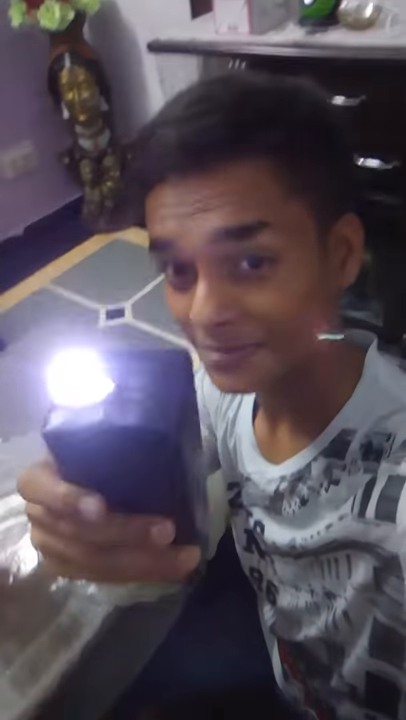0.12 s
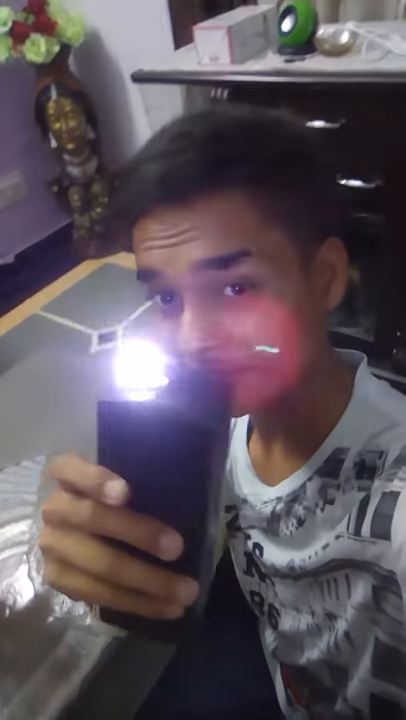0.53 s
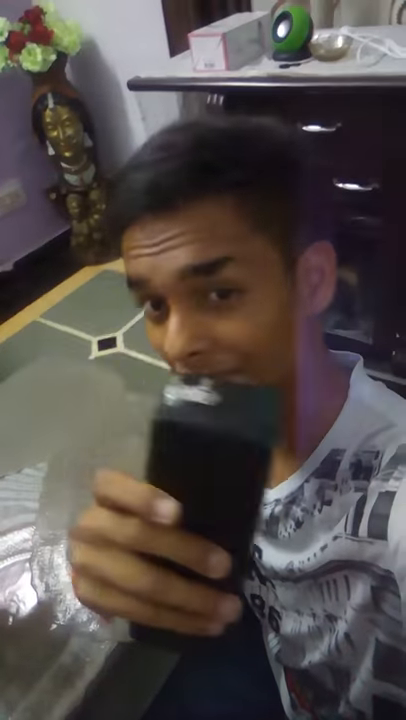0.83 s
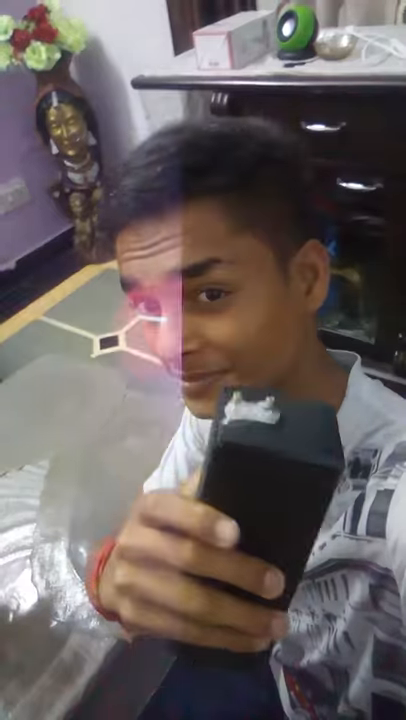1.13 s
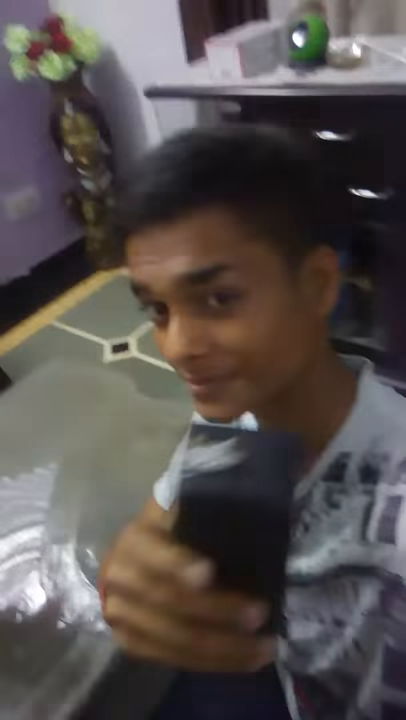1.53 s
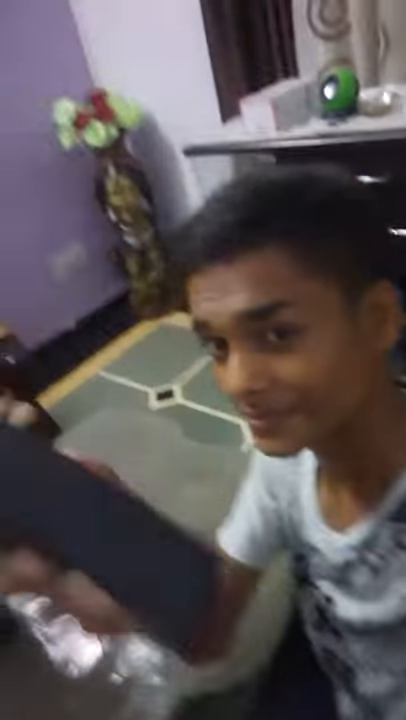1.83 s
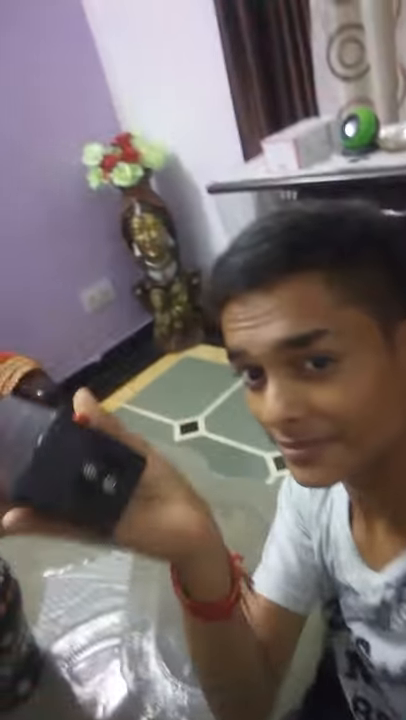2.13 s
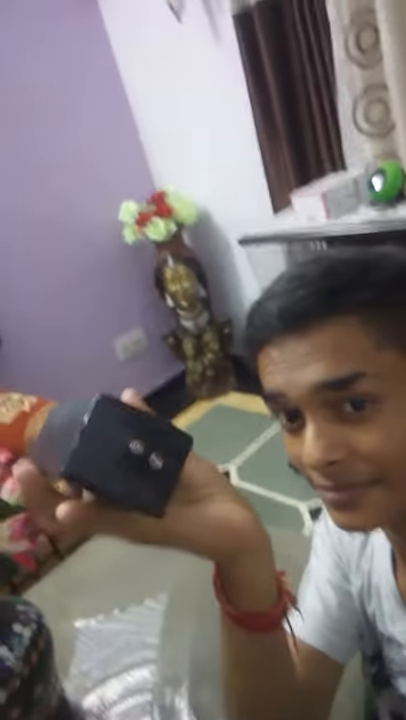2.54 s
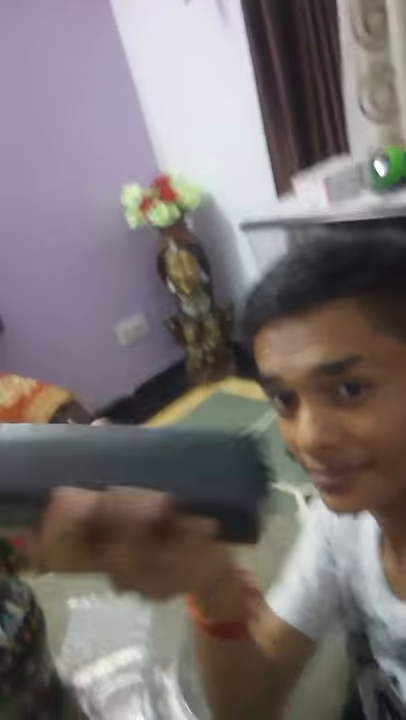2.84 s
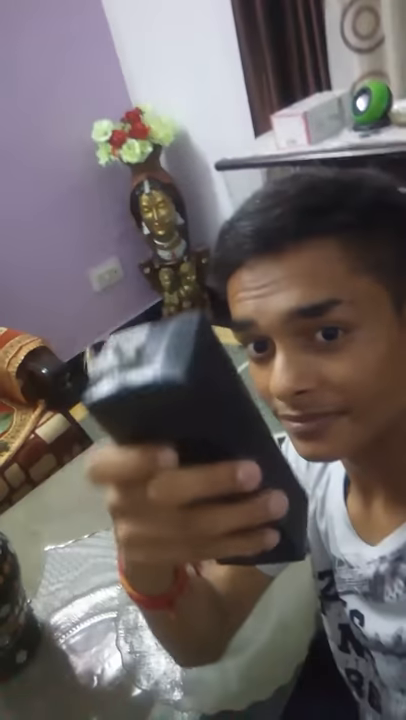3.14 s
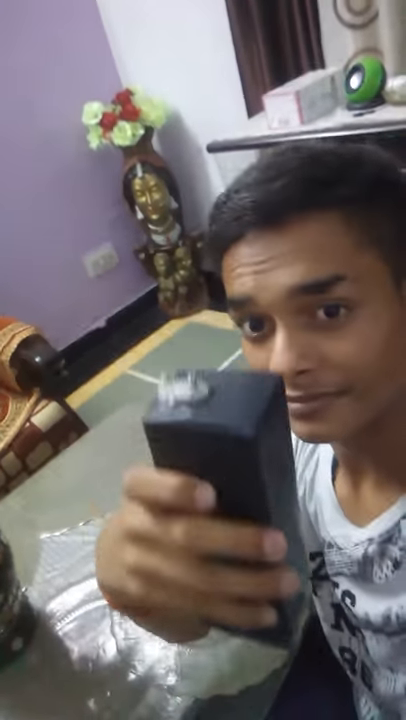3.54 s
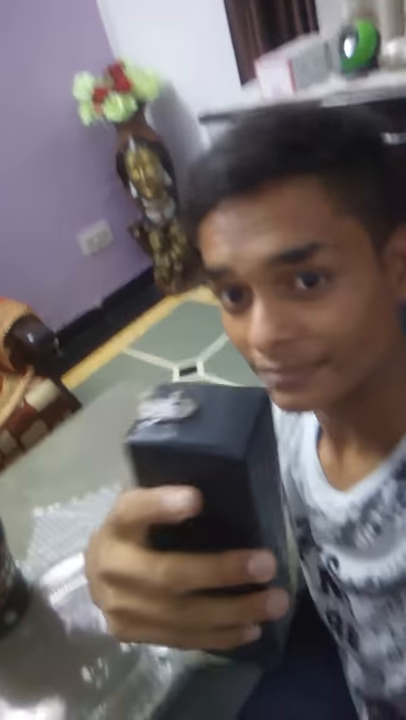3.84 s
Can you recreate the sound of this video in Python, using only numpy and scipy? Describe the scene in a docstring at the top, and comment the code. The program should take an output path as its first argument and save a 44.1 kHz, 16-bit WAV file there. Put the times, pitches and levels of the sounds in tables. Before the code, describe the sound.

Loud, rapid, evenly spaced spark snaps from a handheld stun gun, distorted and squashed at close range with bright room echo, end after nearly three seconds; a few light case clicks follow, then near silence.

```python
"""Stun gun in a hard-walled room

A homemade stun gun arcs about eleven times a second, close to the two microphone ports of a phone.
Each spark is a burst of noise with wall reflections and a grainy room tail; it overloads the ports with
a low pop, and pops the left one again as an echo returns. A limiter holds the train down and lets the room
swell after the last spark; then the plastic case clicks as ringing modes, over a soft rub and quiet air."""
import sys
import numpy as np
from scipy import signal
from scipy.fft import rfft, irfft, next_fast_len
from scipy.io import wavfile
from scipy.ndimage import uniform_filter1d, minimum_filter1d

SR = 44100
rng = np.random.default_rng(int(sys.argv[2]) if len(sys.argv) > 2 else 0)


def generate_wav(sig):
    """Save sig (samples, or channels by samples) to the path in sys.argv[1] as 16-bit PCM at SR."""
    pcm = np.round(np.clip(np.atleast_2d(sig).T, -1, 1) * 32767).astype(np.int16)
    wavfile.write(sys.argv[1], SR, pcm)


N = 176400

# The train of arcs. Each row: start in seconds, relative spark strength in dB, left port pop in dB,
# echo pop in dB, right port pop in dB, rasp in dB, echo delay in seconds.
ARCS = [(-0.008, 0.0, -5.0, -5.0, -18.0, -13.0, 0.0102), (0.0721, 1.4, -9.0, -2.0, -28.0, -9.0, 0.0102),
        (0.1497, 0.6, -11.0, -4.0, -21.0, -11.0, 0.0102), (0.2305, 1.1, -14.0, -11.0, -9.0, -17.0, 0.0109),
        (0.3143, 1.7, -7.0, -5.0, -21.0, -11.0, 0.0101), (0.3987, 0.1, -9.0, -3.0, -16.0, -11.0, 0.0103),
        (0.4822, -1.6, -7.0, -3.0, -16.0, -7.0, 0.0101), (0.5637, -0.1, -9.0, -5.0, -15.0, -10.0, 0.0101),
        (0.6476, 0.7, -11.0, -9.0, -22.0, -11.0, 0.0101), (0.7297, 0.5, -10.0, -5.0, -21.0, -11.0, 0.0086),
        (0.8111, 0.9, -7.0, 1.0, -24.0, -3.0, 0.0089), (0.89, -1.8, -6.0, 4.0, -22.0, -6.0, 0.0085),
        (0.9687, 0.7, -8.0, 0.0, -14.0, -7.0, 0.0086), (1.052, 0.1, -7.0, -8.0, -11.0, -12.0, 0.0087),
        (1.1377, 1.0, -9.0, 0.0, -16.0, -9.0, 0.0087), (1.227, 1.0, -8.0, 0.0, -17.0, -8.0, 0.0086),
        (1.3203, 1.5, -9.0, 0.0, -17.0, -9.0, 0.0086), (1.4106, 1.3, -7.0, 0.0, -16.0, -9.0, 0.0087),
        (1.4986, 0.1, -7.0, -1.0, -6.0, -9.0, 0.0087), (1.5952, 0.1, -9.0, 1.0, -5.0, -9.0, 0.0088),
        (1.7032, 1.8, -22.0, -6.0, -11.0, -7.0, 0.0099), (1.7905, 2.2, -5.0, -10.0, -25.0, -8.0, 0.0098),
        (1.8805, -0.2, -3.0, 0.0, -29.0, -7.0, 0.0093), (1.9779, -0.0, -7.0, -2.0, -31.0, -9.0, 0.009),
        (2.0663, -3.6, 0.0, -3.0, -31.0, -5.0, 0.009), (2.1632, 0.3, -11.0, -4.0, -29.0, -9.0, 0.0089),
        (2.2577, -0.7, -10.0, -3.0, -29.0, -10.0, 0.0089), (2.348, -1.9, -15.0, -2.0, -30.0, -12.0, 0.0089),
        (2.4473, -0.2, -10.0, -12.0, -29.0, -11.0, 0.0087),
        (2.5357, -0.4, -10.0, -6.0, -29.0, -9.0, 0.0089), (2.6251, 0.4, -9.0, -8.0, -30.0, -15.0, 0.0089),
        (2.7199, -1.4, -4.0, -12.0, -30.0, -12.0, 0.0088), (2.8339, 0.1, -8.0, -4.0, -22.0, -14.0, 0.0092)]
# Colour of the bare crack. Each row: frequency in Hz, level in dB.
CRACK_COLOUR = [(60, -4), (400, -3), (1500, -1), (4000, 0), (9000, -4), (16000, -3)]
# First reflections off the walls. Each row: delay in seconds, left level in dB, right level in dB.
WALL_REFLECTIONS = [(.0032, -8, -20), (.0061, -8, -7), (.0105, -8, -11), (.0148, -9, -10)]
# Colour of the room after an arc. Each row: frequency in Hz, level in dB.
ARC_ROOM_COLOUR = [(40, -22), (150, -21), (600, -19), (1100, -13), (2200, -5), (4000, 0), (7000, 0),
                   (11000, -.5), (16000, -1)]
# How long the room rings. Each row: frequency in Hz, time to fall 60 dB in seconds.
ROOM_DECAY = [(300, .38), (1000, .44), (3000, .41), (7000, .36), (15000, .31)]
# Colour of the overloaded port's rasp. Each row: frequency in Hz, level in dB.
RASP_COLOUR = [(150, -18), (500, -5), (1250, 0), (1900, -5), (4000, -22), (12000, -40)]
# Clicks of the case. Each row: time in seconds, relative peak in dB, left over right in dB,
# ring frequency in Hz, room level in dB.
CASE_CLICKS = [(3.079, -13, 9, 2610, -33), (3.196, -19, 13, 5440, -32), (3.2, -25, -2, 2000, -42),
               (3.209, -21, 7.5, 5570, -43), (3.323, -31, 14, 6500, -60), (3.333, -15, 2.5, 3100, -34),
               (3.342, -21, 10, 5520, -42), (3.352, -20, 6.5, 3310, -44), (3.393, -7, 13, 3410, -28)]
# Modes of the plastic case. Each row: frequency in Hz, level in dB, time to fall 60 dB in seconds.
CASE_MODES = [(700, -27, .02), (1900, -11, .005), (3400, -5, .004), (5970, -14, .006), (14900, -17, .005)]
# Colour of the snap that opens a click. Each row: frequency in Hz, level in dB.
SNAP_COLOUR = [(100, -32), (500, -16), (1200, -2), (3000, 1), (7000, 0), (16000, -4)]
# Colour of the room after a click. Each row: frequency in Hz, level in dB.
CLICK_ROOM_COLOUR = [(100, -27), (400, -16), (700, -4), (1200, -5), (2300, 0), (4000, -1), (7000, -6),
                     (11000, -8), (16000, -12)]
# Colour of fingers rubbing the case. Each row: frequency in Hz, level in dB.
RUB_COLOUR = [(200, -25), (1500, -6), (3500, -4), (6000, 0), (9000, -2), (15000, -14)]
# Colour of the quiet room air. Each row: frequency in Hz, level in dB.
AIR_COLOUR = [(25, -14), (100, 0), (350, -2), (600, -4), (850, -2), (1400, -10), (2600, -12), (6000, -22),
              (9000, -30), (16000, -35)]
# Response of the microphones. Each row: frequency in Hz, gain in dB.
MIC_RESPONSE = [(3500, 0), (5200, 2), (6600, 4), (8000, -4), (10500, -2), (13500, -2), (14600, 6),
                (15400, 7)]
# Response of the right port against the left. Each row: frequency in Hz, gain in dB.
RIGHT_PORT_RESPONSE = [(100, -10), (700, -9), (1600, -7), (2800, -1.5), (6000, -4), (10000, -3.5),
                       (14000, -9), (15500, -8)]

SPARK_GAIN_DB = 14.5  # lifts the sparks and their port pops over everything else
ROOM_T = np.arange(int(.7 * SR)) / SR  # seconds, length of a room tail
SHORT_T = ROOM_T[:SR // 20]  # seconds, length of a crack, pop or click


def amp(db):
    """Decibels to gain."""
    return 10 ** (np.asarray(db) / 20)


def unit(x):
    """Scale to rms 1."""
    return x / np.sqrt(np.mean(x ** 2) + 1e-20)


def along(points, hz):
    """Read (Hz, value) points on a log frequency axis."""
    point_hz, value = np.transpose(points)[:2]
    return np.interp(np.log(hz + 1), np.log(point_hz + 1), value)


def colour(x, points):
    """Minimum-phase filter through (Hz, dB) points, so nothing sounds before its cause."""
    n = x.shape[-1]
    m = 2 * next_fast_len(n // 2 + 2048)
    log_gain = np.log(amp(along(points, np.fft.rfftfreq(m, 1 / SR))))
    cepstrum = irfft(log_gain)
    # Folding the cepstrum onto positive time makes the filter causal.
    cepstrum[1:m // 2] *= 2
    cepstrum[m // 2 + 1:] = 0
    response = np.exp(rfft(cepstrum))
    return irfft(rfft(x, m) * response, m)[..., :n]


def noise(points, size):
    """Coloured noise of rms 1, unrelated left and right."""
    return unit(colour(rng.standard_normal((2, size)), points))


def add(out, start_s, x):
    """Mix x into out at start_s, trimming what falls outside."""
    k = int(round(start_s * SR))
    x = x[..., max(-k, 0):max(N - k, 0)]
    first = max(k, 0)
    out[..., first:first + x.shape[-1]] += x


def room_tail(white, spectrum, build_s):
    """Grainy reverberation that builds up quickly and decays at its own rate in each frequency band."""
    grain_db = 1.8 * unit(uniform_filter1d(rng.standard_normal(white.shape), size=24))
    coloured = unit(colour(white * amp(grain_db), spectrum))
    hz, t, bands = signal.stft(coloured, SR, nperseg=256)
    decay = amp(-60 * t / along(ROOM_DECAY, hz)[:, None])
    tail = signal.istft(bands * decay, SR, nperseg=256)[1]
    return tail[:, :len(ROOM_T)] * (1 - np.exp(-ROOM_T / build_s))


def sparks():
    """Each arc: a crack, its first reflections, and a room tail, partly the same for every arc and mostly fresh."""
    crack_db, crack_right_db, crack_t60_s = -9, 2, .014
    tail_db, tail_build_s = -11.5, .006
    same_share = .3  # part of the tail noise power that every arc has in common
    colour_scatter_db = 1.5  # from arc to arc
    out = np.zeros((2, N))
    same = rng.standard_normal((2, len(ROOM_T)))
    for start_s, strength_db, *_ in ARCS:
        crack = noise(CRACK_COLOUR, len(SHORT_T)) * amp(-60 * SHORT_T / crack_t60_s)
        crack = amp(strength_db + crack_db) * amp([[0], [crack_right_db]]) * crack
        add(out, start_s, crack)
        for delay_s, left_db, right_db in WALL_REFLECTIONS:
            jitter_s = rng.normal(0, .0002)
            add(out, start_s + delay_s + jitter_s, crack * amp([[left_db], [right_db]]))
        fresh = rng.standard_normal(same.shape)
        white = np.sqrt(same_share) * same + np.sqrt(1 - same_share) * fresh
        spectrum = [(hz, db + rng.normal(0, colour_scatter_db)) for hz, db in ARC_ROOM_COLOUR]
        add(out, start_s, amp(strength_db + tail_db) * room_tail(white, spectrum, tail_build_s))
    return amp(SPARK_GAIN_DB) * out


def pop(kick_decay_s, swing_delay_s, swing_rise_s, swing_decay_s, swing_db):
    """An overloaded port kicks one way and swings back more slowly, its timing scattered each time."""
    kick_rise_s, scatter = .00012, .35
    times = np.array([kick_decay_s, swing_delay_s, swing_rise_s, swing_decay_s])
    kick_decay, delay, swing_rise, swing_decay = times * np.exp(scatter * rng.standard_normal(4))
    late = np.maximum(SHORT_T - delay, 0)
    kick = (1 - np.exp(-SHORT_T / kick_rise_s)) * np.exp(-SHORT_T / kick_decay)
    swing = (1 - np.exp(-late / swing_rise)) * np.exp(-late / swing_decay)
    return amp(swing_db) * swing / swing.max() - kick / kick.max()


def port_pops():
    """The shock wave pops both ports; its echo pops the left one again, which also rasps briefly each time."""
    pop_db, highpass_hz = 1, 50
    base_rasp_db, rasp_t60_s = -7.5, .024
    out = np.zeros((2, N))
    left, right = out
    for start_s, _, left_db, echo_db, right_db, rasp_db, echo_s in ARCS:
        rasp_fade = amp(rasp_db + base_rasp_db - 60 * SHORT_T / rasp_t60_s)
        direct_rasp, echo_rasp = rasp_fade * noise(RASP_COLOUR, len(SHORT_T))
        # Pop settings: kick decay s, swing delay s, swing rise s, swing decay s, swing dB.
        direct_pop = pop(.0004, .0006, .0003, .0007, -2)
        echo_pop = pop(.0006, .0016, .003, .0021, -8)
        right_pop = pop(.0007, .002, .002, .002, -12)
        add(left, start_s, amp(left_db) * direct_pop + direct_rasp)
        add(left, start_s + echo_s, amp(echo_db) * echo_pop + echo_rasp)
        add(right, start_s, amp(right_db) * right_pop)
    highpass = signal.butter(2, highpass_hz, "hp", fs=SR, output="sos")
    return amp(SPARK_GAIN_DB + pop_db) * signal.sosfilt(highpass, out)


def case_clicks():
    """Short plastic clicks: a snap, a ring that depends on the spot, the modes of the case, and the room."""
    click_db, lag_s, rise_s = -2.5, .001, .0004
    ring_t60_s, snap_db, snap_t60_s, room_build_s = .004, -6, .01, .03
    out = np.zeros((2, N))
    for time_s, peak_db, pan_db, ring_hz, room_db in CASE_CLICKS:
        click = amp(snap_db - 60 * SHORT_T / snap_t60_s) * noise(SNAP_COLOUR, len(SHORT_T))[0]
        for hz, mode_db, t60_s in [*CASE_MODES, (ring_hz, 0, ring_t60_s)]:
            fade = amp(mode_db + rng.normal(0, 2) - 60 * SHORT_T / t60_s)
            click = click + fade * np.sin(2 * np.pi * hz * SHORT_T)
        click = click * (1 - np.exp(-SHORT_T / rise_s))
        click = amp(peak_db + click_db) * click / np.abs(click).max()
        add(out, time_s + lag_s, click * amp([[pan_db / 2], [-pan_db / 2]]))
        white = rng.standard_normal((2, len(ROOM_T)))
        add(out, time_s + lag_s, amp(room_db) * room_tail(white, CLICK_ROOM_COLOUR, room_build_s))
    return out


def swell(centre_s, width_s):
    """Bell-shaped rise and fall of level."""
    return np.exp(-.5 * ((np.arange(N) / SR - centre_s) / width_s) ** 2)


def finger_rub():
    """Fingers shift on the case: a soft swell of friction noise."""
    return amp(-59) * swell(3.805, .028) * noise(RUB_COLOUR, N)


def faint_tone():
    """A faint tone swells and fades: noise in a narrow band."""
    hz = 810
    band = [(hz * .88, -60), (hz, 0), (hz * 1.12, -60)]  # Hz, dB
    return amp(-66) * swell(3.8, .06) * noise(band, N)


def room_air():
    """Quiet room air: steady noise, weak in the treble."""
    return amp(-66) * noise(AIR_COLOUR, N)


def scene():
    """Everything as the two ports pick it up; the pops arise in the ports, past the microphone response."""
    in_room = sparks() + case_clicks() + finger_rub() + faint_tone() + room_air()
    left, right = colour(in_room, MIC_RESPONSE)
    return np.array([left, colour(right, RIGHT_PORT_RESPONSE)]) + port_pops()


def record(dry):
    """The microphones saturate; a limiter ducks at once, holds and releases; the top is cut off."""
    overload_db, ceiling_db = 14.5, -.3
    hold_s, release_db_per_s, top_hz = .058, 155, 15650
    x = dry / (1 + np.abs(dry / amp(overload_db)) ** 6) ** (1 / 6)
    peak_db = 20 * np.log10(np.abs(x).max(0) + 1e-9)  # louder port steers both
    need_db = np.minimum(ceiling_db - peak_db, 0)
    hold = 2 * int(hold_s * SR / 2) + 1
    held_db = minimum_filter1d(need_db, hold, origin=hold // 2, mode="nearest")
    # On a rising ramp, a running minimum becomes a steady release.
    ramp_db = release_db_per_s * np.arange(N) / SR
    gain_db = np.minimum.accumulate(held_db - ramp_db) + ramp_db
    gain_db = uniform_filter1d(minimum_filter1d(gain_db, size=45), size=45)  # about 1 ms
    m = next_fast_len(N + SR // 2)
    lowpass = 1 / (1 + (np.fft.rfftfreq(m, 1 / SR) / top_hz) ** 200)
    return irfft(rfft(x * amp(gain_db), m) * lowpass, m)[:, :N]


dry = scene()
out = record(dry)
generate_wav(out)
```